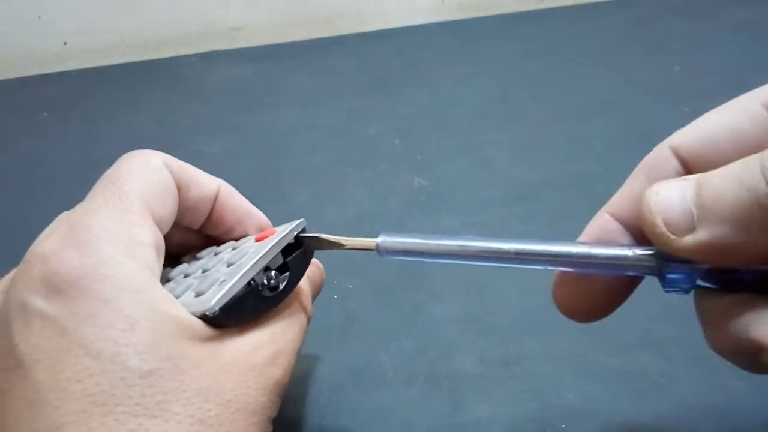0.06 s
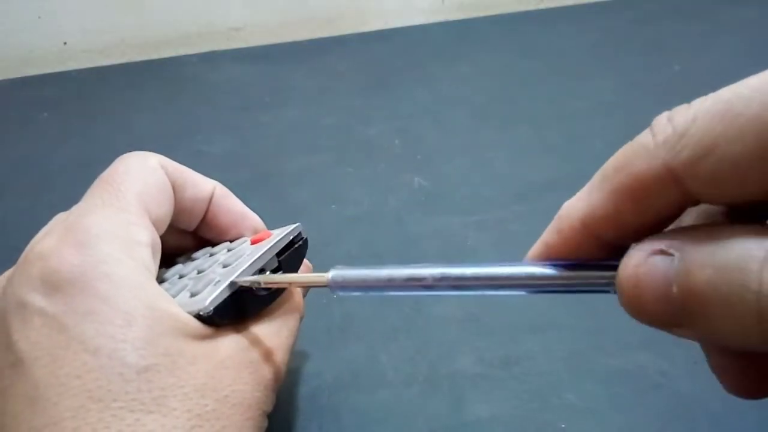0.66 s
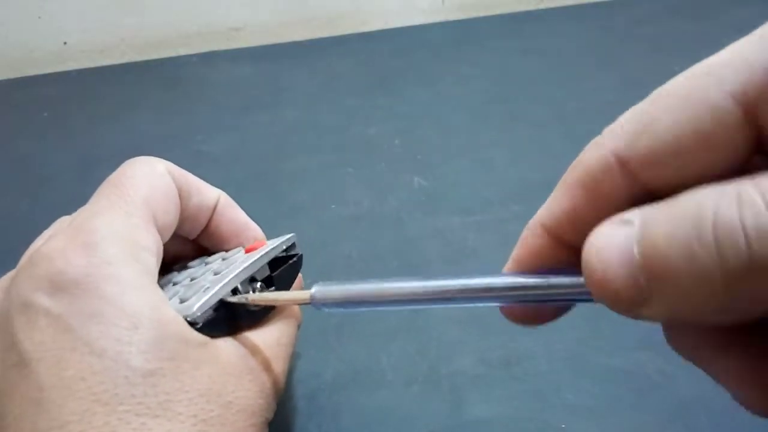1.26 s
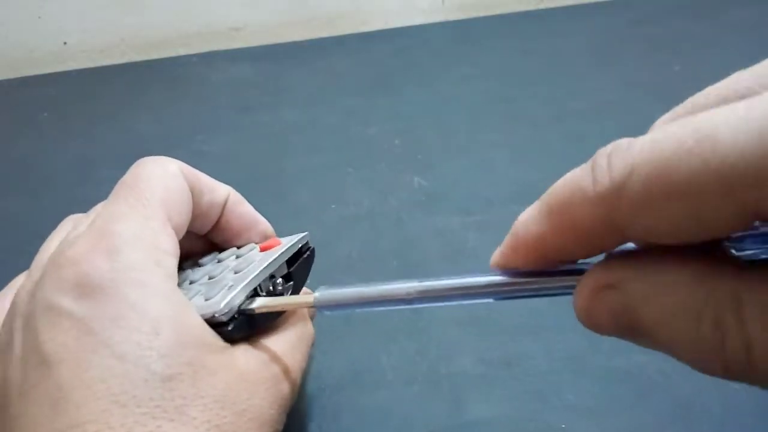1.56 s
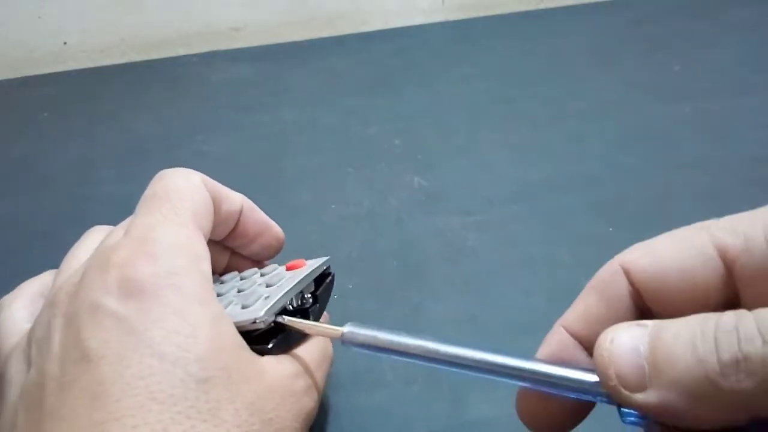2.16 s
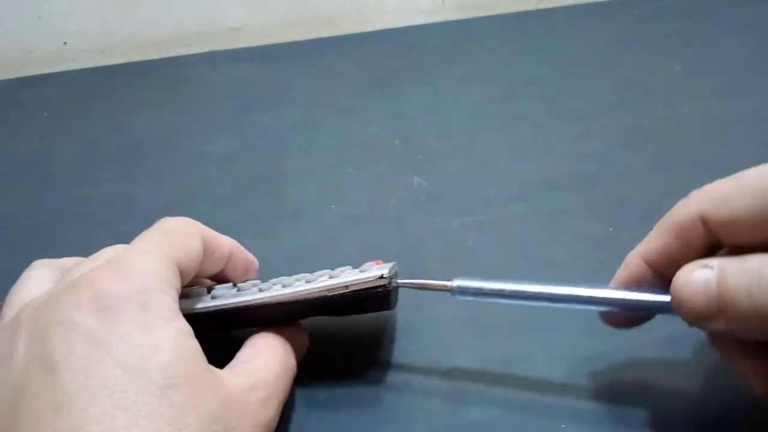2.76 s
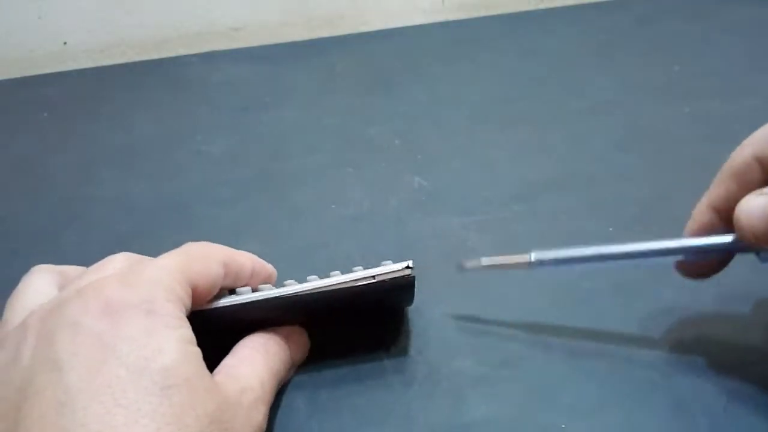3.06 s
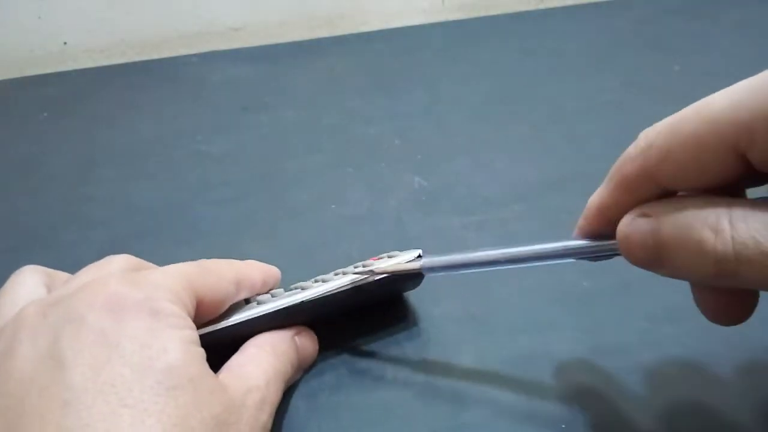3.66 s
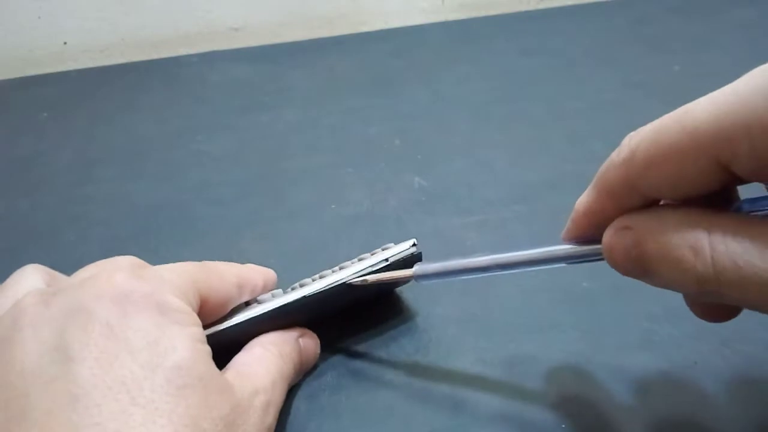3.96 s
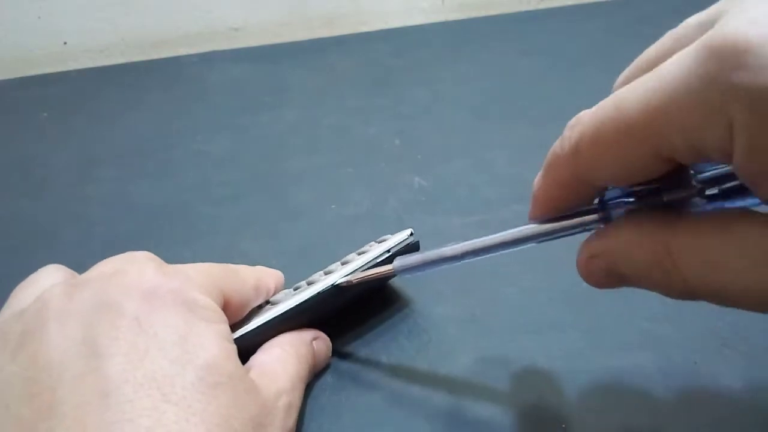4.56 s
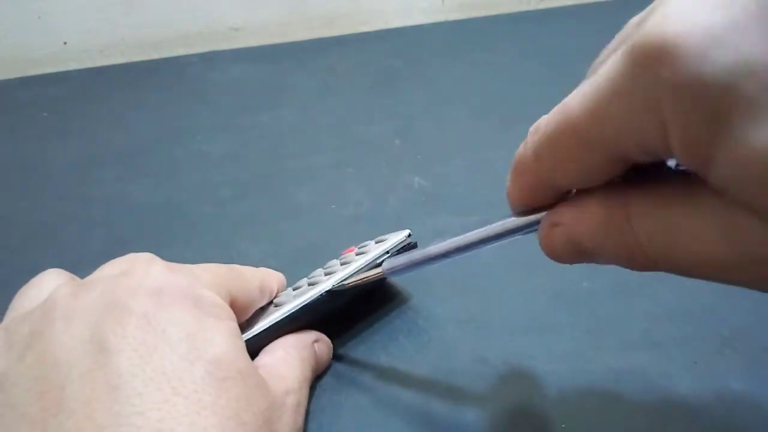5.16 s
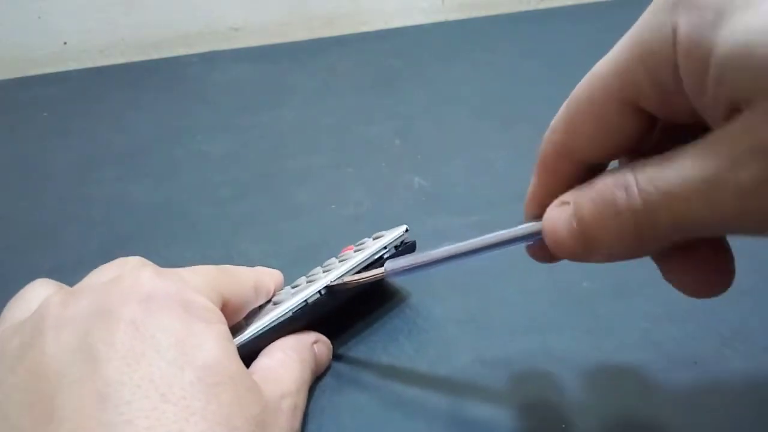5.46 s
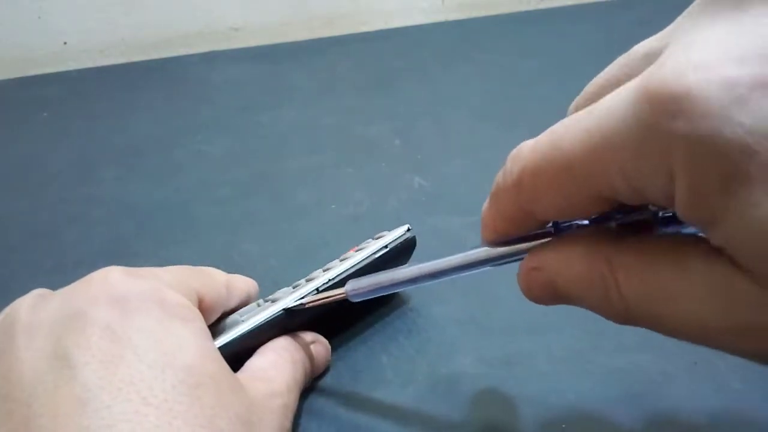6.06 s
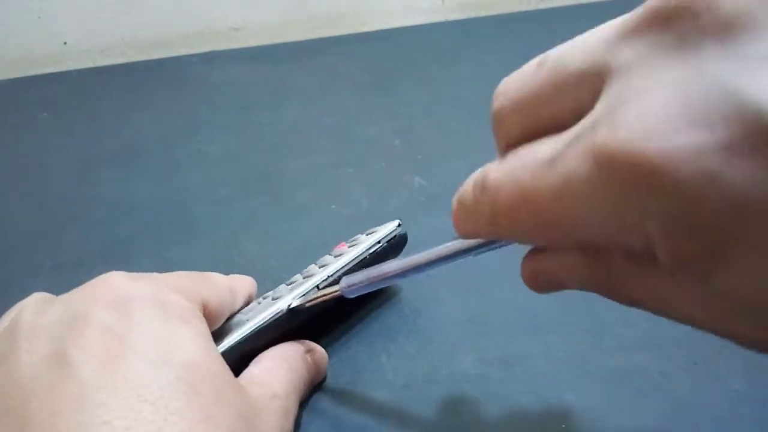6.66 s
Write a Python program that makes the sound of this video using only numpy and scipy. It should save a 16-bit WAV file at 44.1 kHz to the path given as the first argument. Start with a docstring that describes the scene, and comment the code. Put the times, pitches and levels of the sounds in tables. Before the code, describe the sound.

Close up, a screwdriver tip makes small, irregular ticks and short scrapes as it works into a remote control's plastic case. Two catches click free early on, with a brief squeak between them. After more scratching, a last catch lets go with a much louder crack and a short room echo, and the blade keeps ticking at the loosened cover. Faint handling bumps and a low fan hum lie underneath.

```python
"""Prying open a remote control

A small screwdriver works into the seam, close up in a bare, quiet room. The blade ticks as it slips
off the rim, scrapes along the plastic shell and squeaks in stick-slip. Three catches snap; the last is
so loud that a limiter ducks and lets the room's echo swell back. Hands rub and bump the case, the
tabletop booms faintly, and a fan hums behind it all."""
import sys
import numpy as np
from scipy import signal
from scipy.fft import rfft, irfft, next_fast_len
from scipy.io import wavfile
from scipy.ndimage import uniform_filter1d, minimum_filter1d, map_coordinates

SR = 44100
rng = np.random.default_rng(int(sys.argv[2]) if len(sys.argv) > 2 else 0)


def wav_record(signal):
    """Record a signal, one row per channel, as 16-bit PCM in the file named by sys.argv[1]."""
    frames = np.transpose(np.atleast_2d(signal))
    bounded = np.clip(frames, -1, 1)
    # unit amplitude maps onto the largest positive 16-bit level
    quanta = np.round(bounded * 32767).astype(np.int16)
    wavfile.write(sys.argv[1], SR, quanta)


N = 304290


def amp(db):
    """Decibels to gain."""
    return 10 ** (np.asarray(db) / 20)


def unit(x):
    """Scale to rms 1."""
    return x / np.sqrt(np.mean(x ** 2) + 1e-20)


def along(points, hz):
    """Read (f/Hz, value) breakpoints on a log frequency axis."""
    freqs, values = np.transpose(points)
    return np.interp(np.log(hz + 1), np.log(freqs + 1), values)


def eq(points):
    """An EQ curve: gain as a function of Hz, from (f/Hz, level/dB) breakpoints."""
    return lambda hz: amp(along(points, hz))


def wobble(rate, size=N):
    """Smooth random modulation, rate knots a second."""
    knots = rng.standard_normal(int(size * rate / SR) + 4)
    return map_coordinates(knots, [np.arange(size) * rate / SR])


def add(track, s, sound):
    """Mix a sound into a track at time s."""
    part = track[:, max(round(s * SR), 0):][:, :sound.shape[-1]]
    part += sound[..., :part.shape[-1]]


def coloured(x, gain):
    """Minimum-phase filter with a gain given as a function of Hz."""
    n = x.shape[-1]
    m = 2 * next_fast_len(n)
    hz = np.fft.rfftfreq(m, 1 / SR)
    cepstrum = irfft(np.log(np.maximum(gain(hz), 1e-6)), m)
    cepstrum[1:m // 2] *= 2
    cepstrum[m // 2 + 1:] = 0
    return irfft(rfft(x, m) * np.exp(rfft(cepstrum)), m)[..., :n]


def placed(pair, pan_db, lag=3):
    """Pan to the work on the right: pan_db is left minus right, and the left is lag samples late."""
    left, right = np.broadcast_to(pair, (2, pair.shape[-1]))
    late_left = np.pad(left, (lag, 0))[:len(left)]
    return np.array([late_left * amp(pan_db / 2), right * amp(-pan_db / 2)])


# Stereo image of diffuse sound: f/Hz, left-right correlation
COHERENCE = [(60, .95), (130, .84), (300, .8), (640, .45), (1400, .05), (15000, 0)]
def diffuse(pair, spectrum=None):
    """Two unrelated signals become a stereo bed, centred in the bass and wide in the treble."""
    n = pair.shape[-1]
    m = next_fast_len(n + SR // 4)
    hz = np.fft.rfftfreq(m, 1 / SR)
    spread = np.arccos(np.clip(along(COHERENCE, hz), -1, 1)) / 2
    gain = eq(spectrum)(hz) if spectrum else 1
    mid, side = irfft(rfft(pair, m) * gain * [np.cos(spread), np.sin(spread)], m)[:, :n]
    return np.array([mid + side, mid - side])


def rush(spectrum):
    """Diffuse stereo noise of rms 1."""
    return unit(diffuse(rng.standard_normal((2, N)), spectrum))


def drone(hz, drift_rad, flutter_db):
    """An unsteady tone of rms about 1."""
    phase = 2 * np.pi * hz * np.arange(N) / SR + drift_rad * wobble(15.0)
    return np.sqrt(2) * np.sin(phase) * amp(flutter_db * wobble(7.3))


# The fan's hum tones, then the EQ of its air: f/Hz, level/dB
FAN_TONES = [(156.1, -81.5), (236.9, -73.5), (301, -68.5), (339, -73.5), (398.4, -73.5), (608.3, -82)]
AIR_EQ = [(20, -34.5), (35, -25), (52, -10.5), (90, -6.5), (130, -13.5), (230, -5), (330, -9), (420, -9),
          (480, -15), (820, -14.5), (1150, -20), (4000, -35.5), (9000, -43), (13800, -45), (15000, -37.5)]
def fan():
    """Slightly unsteady hum over a bed of moving air."""
    hum = sum(amp(db) * drone(hz, drift_rad=0.44, flutter_db=1.5) for hz, db in FAN_TONES)
    return hum + amp(-63.0) * rush(AIR_EQ) * amp([[-.3], [.3]])


# Grip shifts: t/s, length/s, deep thud/dB, soft knead/dB
GRIP_SHIFTS = [(0.132, 0.18, -65, -83.5), (1.394, 0.363, -56, -66), (2.085, 0.25, -75, -63),
               (4.228, 0.26, -55.5, -72.5), (4.923, 0.26, -59.5, -57.5), (5.66, 0.1, -60, -72),
               (6.448, 0.585, -70.5, -63)]
# Slides to a new hold: t/s, length/s, skin rub/dB, tabletop boom/dB
SLIDES = [(0, 0.049, -79.5, -93), (2.195, 0.665, -73.5, -65.5), (2.796, 0.31, -76, -67.5),
          (3.064, 0.443, -74.5, -73), (3.447, 0.46, -74, -71), (3.825, 0.66, -80, -72),
          (4.227, 0.61, -76, -75), (6.28, 0.72, -72.5, -70)]
# EQs of the thud, the knead and the skin rub: f/Hz, level/dB
THUD_EQ = [(20, -12), (40, -1.5), (55, 13), (85, 4), (130, -20), (400, -59.5)]
KNEAD_EQ = [(50, -19), (140, 1.5), (240, 7.5), (330, -14.5), (520, -13.5), (1500, -55.5)]
SKIN_EQ = [(500, 7), (1000, -4), (1270, 2.5), (1650, -2), (2000, -2.5), (2250, 0.5), (2650, -5.5),
           (3400, 2.5), (3900, 0.5), (4280, 2), (4800, -3), (6500, -6.5), (8500, -24), (15000, -23.5)]
def hands(rest_rub_db=-78, rest_boom_db=-78.5, tabletop_hz=51.6, swell_db=2.5, swells_per_s=14):
    """The grip shifts with soft bumps; each slide rubs skin on plastic and sets the tabletop booming."""
    press, slide = np.zeros((2, 2, N))
    for envelopes, moves, taper in ((press, GRIP_SHIFTS, .7), (slide, SLIDES, .6)):
        for s, length, *levels_db in moves:
            add(envelopes, s, amp(levels_db)[:, None] * signal.windows.tukey(int(length * SR), taper))
    (thud, knead), (rubbing, booming) = press, slide
    uneven = amp(swell_db * wobble(swells_per_s))
    skin = placed((amp(rest_rub_db) + rubbing * uneven) * rush(SKIN_EQ), pan_db=-2.5)
    boom = (amp(rest_boom_db) + booming) * drone(tabletop_hz, drift_rad=0.94, flutter_db=2)
    return placed(thud * rush(THUD_EQ) + boom, pan_db=-4.5) + knead * rush(KNEAD_EQ) + skin


# Modes of the closed case, then of the cover once the last catch lets go: f/Hz, width/Hz, level/dB
CASE_MODES = [(765, 65, 2.5), (870, 60, -1), (1550, 70, -6), (1990, 110, -5), (2860, 80, -6),
              (3610, 60, -2), (4400, 80, -10), (4880, 70, -7), (5690, 80, -10), (6440, 80, -11)]
COVER_MODES = [(1030, 40, -2), (1240, 35, -3), (1850, 65, 0), (2190, 50, 0), (2700, 70, -9), (3600, 50, -4),
               (4430, 40, 0)]
# The blade's route: end face, end seam, first catches, mouth of the side seam, hollow side seam,
# opening gap, loose cover. From t/s, pan/dB, modes/dB, chatter/s, ring Q
SPOTS = [(0, -7, -11, 0.002, 2.9), (0.5, -8.5, -9, 0.0021, 4.42), (1.25, -5, -13, 0.00204, 4.5),
         (3.35, -4.5, 8.5, 0.003, 3.2), (3.55, -7, 18, 0.0065, 1.8), (4.1, -8.5, -0.5, 0.0031, 2.9),
         (5.5, -6, 11, 0.0024, 2.43)]
def spot(s):
    """How the case answers where the blade is at time s: its modes, then that spot's settings."""
    modes = CASE_MODES if s < CATCHES[-1][0] else COVER_MODES
    index = sum(s >= start for start, *_ in SPOTS[1:])
    return modes, *SPOTS[index][1:]


def resonance(hz, centre, width):
    """Gain of one mode, 1 at its centre."""
    return hz * width / np.sqrt((centre ** 2 - hz ** 2) ** 2 + (hz * width) ** 2)


def shell(hz, modes, modes_db):
    """Gain of the shell's modes over a flat response."""
    power = sum((amp(db) * resonance(hz, centre, width)) ** 2 for centre, width, db in modes)
    return np.sqrt(1 + amp(modes_db) ** 2 * power)


# Broad crack of struck plastic: f/Hz, level/dB
PLASTIC_EQ = [(100, -22), (550, -16), (800, -7), (1200, -1), (2200, 0), (3500, -2), (5000, -7), (6800, -11),
              (8200, -26), (13500, -41), (15300, -35)]
def plastic(hz, treble_db, modes, modes_db, shelf_hz=3900):
    """The case's tone: a broad crack with the shell's modes; hard contacts are brighter."""
    shelf = amp(treble_db / (1 + (shelf_hz / (hz + 1)) ** 4))
    return eq(PLASTIC_EQ)(hz) * shelf * shell(hz, modes, modes_db)


def click(db, chatter_s, pan_db, response, rattle=0.36, width=0.9, rise_s=0.00012):
    """A sudden release and brief chatter through a response; db is the rms if packed into 10 ms."""
    t = np.arange(SR // 16) / SR
    common, *sides = rng.standard_normal((3, len(t)))
    envelope = (1 - np.exp(-t / rise_s)) * np.exp(-t / max(chatter_s, 1e-4))
    force = rattle * (common + width * np.array(sides)) * envelope
    force[:, 0] += 1  # the release
    sound = placed(coloured(force, response), pan_db)
    return amp(db) * unit(sound) * np.sqrt(.01 / t[-1])


# Blade hits: t/s, then f/Hz, level/dB for each of the low, middle and high rings, then hard edge/dB
TICKS = [(0.047, 1270, -61, 1700, -65.5, 2730, -71, -77),
         (0.0847, 1230, -72.5, 2040, -65.5, 2780, -74, -85),
         (0.1768, 1230, -61, 1940, -49, 3750, -47.5, -56.5), (0.835, 950, -51, 2070, -47.5, 3320, -49, -82),
         (0.919, 960, -63, 2100, -67.0, 3450, -81, -83.0), (1.786, 1040, -55, 1480, -78.5, 3340, -72, -81),
         (1.941, 980, -65, 1974, -67, 3030, -65, -82.5),
         (1.969, 975.5, -55.5, 1950, -67.5, 2920, -51.5, -91),
         (1.993, 1050, -46, 1790, -54, 3340, -56, -50), (2.349, 1146, -67, 1800, -70, 3420, -68, -67.5),
         (3.2544, 1095, -66, 2000, -69, 3230, -68, -73),
         (3.4555, 1090, -42.5, 1610, -44.5, 3670, -45.0, -51),
         (3.711, 1154, -77, 1460, -87, 3380, -94, -92), (3.747, 820, -41, 1770, -41, 2920, -42, -49),
         (3.969, 790, -65, 1680, -64.5, 3090, -74, -72.5), (4.042, 1150, -62, 1795, -68.0, 3630, -81, -78),
         (4.1363, 1230, -46, 1770, -48, 3025, -48, -64), (4.1433, 844, -44, 1880, -40.5, 3280, -42, -48.5),
         (4.2795, 1060, -42, 2075, -48.5, 2930, -59, -83),
         (4.7605, 1200, -70.5, 1640, -62, 3790, -76, -81.5),
         (4.9442, 1171, -55, 1773, -53, 3060, -61.5, -70.5),
         (5.009, 1195, -64.5, 1660, -73, 2820, -68.5, -82),
         (5.1888, 1076, -60, 2050, -72, 2800, -75.5, -79),
         (5.6603, 1300, -56, 1880, -43.5, 2790, -51, -82.5),
         (5.6805, 1260, -49.5, 1830, -47, 2700, -47, -76), (5.7978, 1200, -65, 1970, -56, 3150, -60.5, -73),
         (5.8585, 1225, -53, 2060, -48.5, 3670, -59.5, -83),
         (5.8635, 1260, -58, 2130, -53, 4320, -70, -78.5), (5.921, 1030, -45, 1730, -52, 2900, -65, -82),
         (6.087, 845, -63.5, 1880, -57.5, 3070, -75.5, -81), (6.2763, 1090, -64, 1970, -62, 3300, -70, -75),
         (6.4417, 970, -63, 1935, -60.5, 3240, -68, -73.5),
         (6.5154, 1270, -56.5, 2190, -56, 2930, -66, -71), (6.644, 1178, -66, 2200, -64, 2630, -65, -89),
         (6.8625, 890, -70, 2050, -63, 3780, -65.5, -74)]
def ticks(focus, rise_s=0.00046, edge_hz=4800):
    """The blade slips off the rim: three rings, broader at low focus, and a hard edge above edge_hz."""
    out = np.zeros((2, N))
    for s, *rings, edge_db in TICKS:
        modes, pan_db, modes_db, chatter_s, ring_q = spot(s)
        for ring_hz, db in zip(rings[::2], rings[1::2]):
            width_hz = ring_hz / (ring_q * focus)
            ring = lambda hz: resonance(hz, ring_hz, width_hz) ** 2 * shell(hz, modes, modes_db)
            add(out, s, click(db, chatter_s, pan_db, ring, rattle=0.43, rise_s=rise_s))
        edge = lambda hz: plastic(hz, 0, modes, modes_db) / (1 + (edge_hz / (hz + 1)) ** 8)
        add(out, s, click(edge_db, chatter_s, pan_db, edge, rattle=0.46, rise_s=rise_s))
    return out


# Blade drags along the seam: t/s, length/s, level/dB, treble shelf/dB, main ring f/Hz
SCRAPES = [(0.161, 0.011, -54, -1.5, 3040), (0.188, 0.0302, -69, 3, 3800), (0.791, 0.044, -63, -8, 3480),
           (1.534, 0.02296, -40, 7.5, 2780), (2.766, 0.15, -70, -22, 1470), (2.95, 0.042, -59, -3, 2960),
           (3.48, 0.067, -54.5, -9, 850), (3.608, 0.022, -52.5, -2.5, 774), (3.628, 0.027, -56, -7, 2670),
           (3.799, 0.026, -52, -8.5, 3760), (3.862, 0.033, -55, -4, 1800), (4.325, 0.043, -56.5, -2, 1920),
           (5.005, 0.036, -66.5, -8, 1240), (5.846, 0.021, -52.5, -10.5, 4410),
           (5.91, 0.01, -59.5, -11, 1602), (6.429, 0.12, -76, 2, 2200), (6.773, 0.037, -69.5, -20, 2170)]
def scrapes(slips_per_s=600, grit=0.18, ring_db=6.5, ring_width_hz=160, modes_lift_db=2.5):
    """Tiny uneven slips bring out the shell's modes more than a tick; each stroke favours one ring."""
    out = np.zeros((2, N))
    for s, length, db, treble_db, ring_hz in SCRAPES:
        modes, _, modes_db, *_ = spot(s)
        n = int(length * SR)
        slips = (rng.random(n) < slips_per_s / SR) * rng.standard_normal(n)
        friction = slips + grit * rng.standard_normal((2, n))
        force = np.pad(friction * signal.windows.tukey(n, .5), ((0, 0), (0, n)))
        ring = lambda hz: np.hypot(1, amp(ring_db) * resonance(hz, ring_hz, ring_width_hz))
        sound = coloured(force, lambda hz: plastic(hz, treble_db, modes, modes_db + modes_lift_db) * ring(hz))
        add(out, s, amp(db) * unit(placed(sound, pan_db=-6.0)) / np.sqrt(2))
    return out


def ping(hz, peak_s):
    """A 10 ms damped tone whose envelope peaks at peak_s."""
    t = np.arange(SR // 100) / SR
    return np.sin(2 * np.pi * hz * t) * t / peak_s * np.exp(1 - t / peak_s)


# Catches letting go: t/s, crack/dB, chatter/s, second slip delay/s, second slip gain/dB,
# pop f/Hz, pop/dB, knock/dB, thump/dB, pan/dB, crack's room send/dB
CATCHES = [(1.3399, -29.5, 0.003, 0.0027, -3, 1880, -20, -34.5, -51, -5.5, -7.5),
           (1.982, -36.5, 0.0024, 0.0011, 0.5, 1080, -41.5, -49, -64.5, -6.5, -8.5),
           (5.3173, -1.5, 0.0026, 0.003, -22, 2110, 17, -27, -39, -4.5, -11.5)]
# EQs of the three cracks and of the shell's thump: f/Hz, level/dB
FIRST_EQ = [(290, -16), (520, -11), (680, -10), (880, -7.5), (1220, 0), (1500, -5), (1800, -2), (2350, 2),
            (3300, -3), (4500, -8), (5000, -6), (5500, 1), (6000, -7), (7500, -15), (12500, -31),
            (15200, -21)]
SECOND_EQ = [(290, -17), (880, -10), (1030, 6), (1200, -6), (1750, 1), (2200, -6), (2800, 1), (3100, -3),
             (3600, 1), (4500, -10), (5700, -7), (6150, -1), (6700, -8), (7600, -20), (12500, -25),
             (15200, -20)]
LAST_EQ = [(290, -30), (500, -22), (850, -14), (1030, -6.5), (1300, -5.5), (1600, -9), (1880, -3),
           (2080, 2), (2280, 1.5), (2400, -2.5), (2800, -3.5), (3300, -3.5), (4500, -8), (6500, -11.5),
           (8300, -17.5), (13500, -24.5), (15300, -17.5)]
THUMP_EQ = [(25, -38), (40, -13.5), (52, 9.5), (150, 4.5), (280, 10), (450, -0.5), (800, -28.5),
            (2000, -64)]
def snaps(spring_s=0.00044, knock_hz=510, knock_s=0.0013):
    """Each catch cracks in two slips, the wall springs back with a pop, the shell knocks and thumps."""
    cracks, pops, body = np.zeros((3, 2, N))
    knock = ping(knock_hz, knock_s)
    thump = unit(coloured(signal.unit_impulse(SR // 10), eq(THUMP_EQ)))
    for catch, colour in zip(CATCHES, (FIRST_EQ, SECOND_EQ, LAST_EQ)):
        s, db, chatter_s, again_s, again_db, pop_hz, pop_db, knock_db, thump_db, pan_db, _ = catch
        pop = ping(pop_hz, spring_s)
        for slip_s, slip_db in ((s, 0), (s + again_s, again_db)):
            add(cracks, slip_s, click(db + slip_db, chatter_s, pan_db, eq(colour)))
            add(pops, slip_s, placed(amp(pop_db + slip_db) * pop, pan_db))
        add(body, s, amp(knock_db) * knock)
        add(body, s, amp(thump_db) * thump)
    return cracks, pops, body


def crack_send():
    """Each crack as the walls get it: over all directions its chatter evens out to one clean pulse."""
    out = np.zeros((2, N))
    for (s, db, *_, send_db), colour in zip(CATCHES, (FIRST_EQ, SECOND_EQ, LAST_EQ)):
        add(out, s, click(db + send_db, 0, 0, eq(colour), rattle=0)[0])
    return out


# Steel tip squeaking on plastic: t/s, length/s, f/Hz, level/dB
SQUEAKS = [(1.541, 0.00475, 3327, -22), (1.545, .0064, 3420, -21)]
def squeaks(harmonics_db=(0, -22), jitter_rad=0.014):
    """Regular stick-slip gives a short, nearly pure chirp."""
    out = np.zeros((2, N))
    for s, length, hz, db in SQUEAKS:
        n = int(length * SR)
        phase = np.cumsum(2 * np.pi * hz / SR + jitter_rad * rng.standard_normal(n))
        tone = sum(amp(level) * np.sin(k * phase) for k, level in enumerate(harmonics_db, 1))
        envelope = np.sin(np.pi * np.arange(n) / n)
        add(out, s, placed(amp(db) * tone * envelope, pan_db=-11.0))
    return out


# Reverb time of the bare room: f/Hz, 60 dB decay/s
ROOM_DECAY = [(60, 0.72), (250, 0.9), (600, 0.68), (1100, 0.55), (2200, 0.54), (3400, 0.49), (6000, 0.42),
              (14000, 0.3)]
def room(x, build_up_s=0.00067, clump_db=2):
    """Bare walls answer within milliseconds with a diffuse tail whose treble dies soonest."""
    hz, t, noise = signal.stft(rng.standard_normal((2, SR)), SR, nperseg=256)
    decay = amp(-60 * t / along(ROOM_DECAY, hz)[:, None])
    tail = signal.istft(noise * decay, SR, nperseg=256)[1]
    tail *= amp(clump_db * wobble(400, size=tail.shape[1]))  # reflections arrive in clumps
    attack = 1 - np.exp(-np.arange(tail.shape[1]) / SR / build_up_s)
    tail = diffuse(tail * attack)
    return signal.fftconvolve(x.mean(0)[None], tail / np.linalg.norm(tail[0]), axes=1)[:, :N]


def moving_room(x, block=16384):
    """The hands keep moving, so each stretch of the work meets a new pattern of echoes."""
    out = np.zeros((2, N))
    for start in range(0, N, block):
        add(out, start / SR, room(x[:, start:start + block]))
    return out


def scene(wall_delay_s=0.02, wall_db=-15.5):
    """The mix: close work and its echoes over the hands and the fan."""
    drag, squeak = scrapes(), squeaks()
    blade = ticks(focus=1) + drag
    cracks, pops, body = snaps()
    blurred_ticks = ticks(focus=.35)  # the walls hear the ticks from all sides, which blurs their rings
    blade_send = amp(-9.5) * blurred_ticks + amp(-10.0) * drag + amp(-9.0) * squeak
    echo = moving_room(blade_send + crack_send() + body)
    add(echo, wall_delay_s, amp(wall_db) * (blade + squeak).mean(0))  # slap off the nearest wall
    return blade + cracks + pops + squeak + echo + hands() + fan()


def record(dry, ceiling_db=-.3, release_db_per_s=250, top_hz=15750):
    """A fast limiter with a gradual release, then a steep high cut."""
    over_db = np.maximum(20 * np.log10(np.abs(dry).max(0) + 1e-9) - ceiling_db, 0)
    released_db = release_db_per_s * np.arange(N) / SR
    duck_db = np.maximum.accumulate(over_db + released_db) - released_db
    held_db = minimum_filter1d(-duck_db, size=89)  # 1 ms of look-ahead
    gain = amp(uniform_filter1d(held_db, size=45))
    m = next_fast_len(N + SR // 4)
    high_cut = 1 / (1 + (np.fft.rfftfreq(m, 1 / SR) / top_hz) ** 120)
    return irfft(rfft(dry * gain, m) * high_cut, m)[:, :N]


dry = scene()
out = record(dry)
wav_record(out)
```